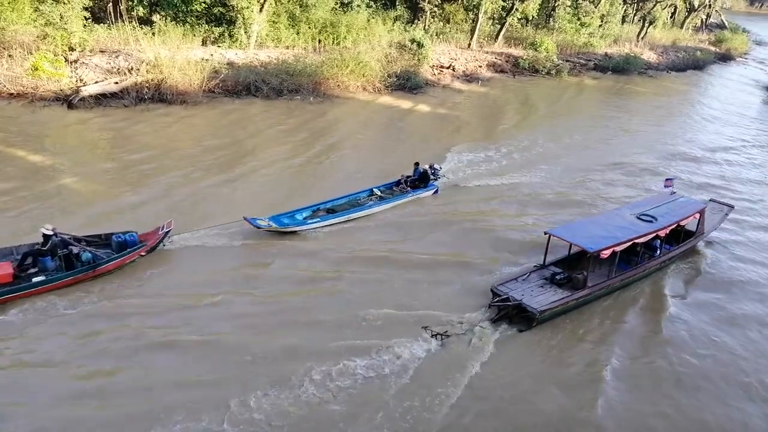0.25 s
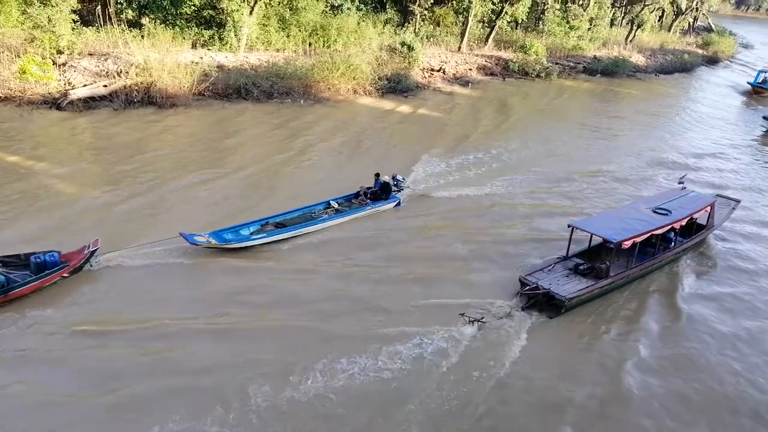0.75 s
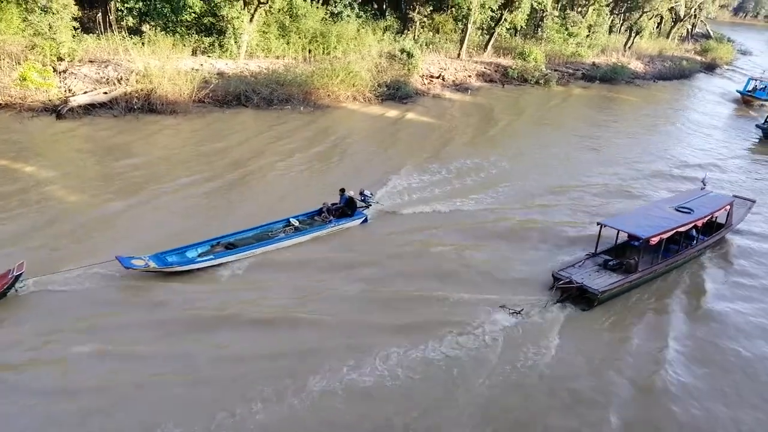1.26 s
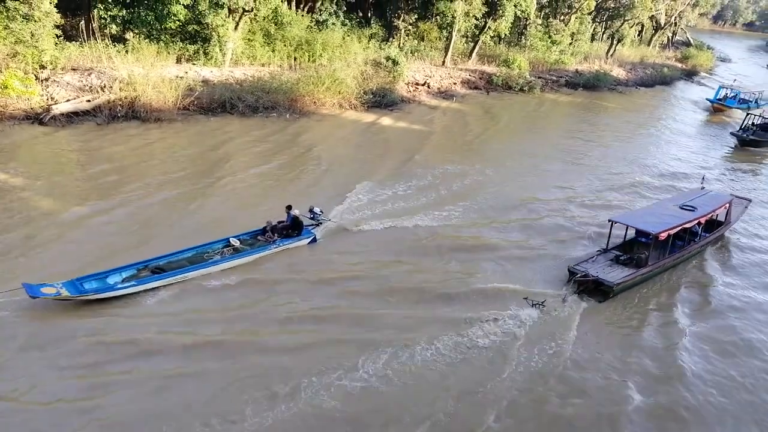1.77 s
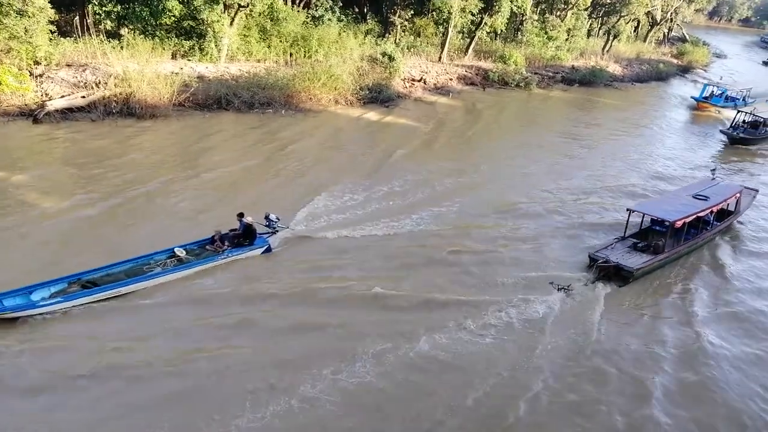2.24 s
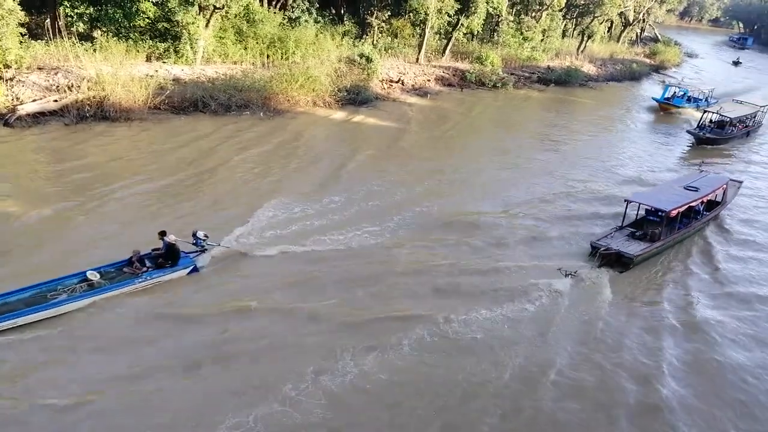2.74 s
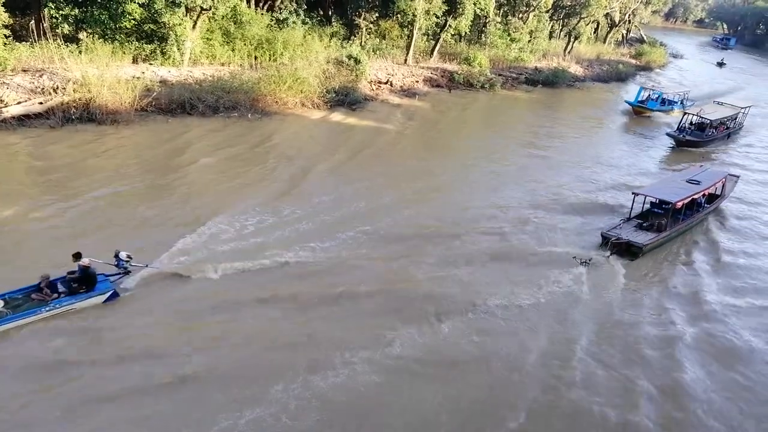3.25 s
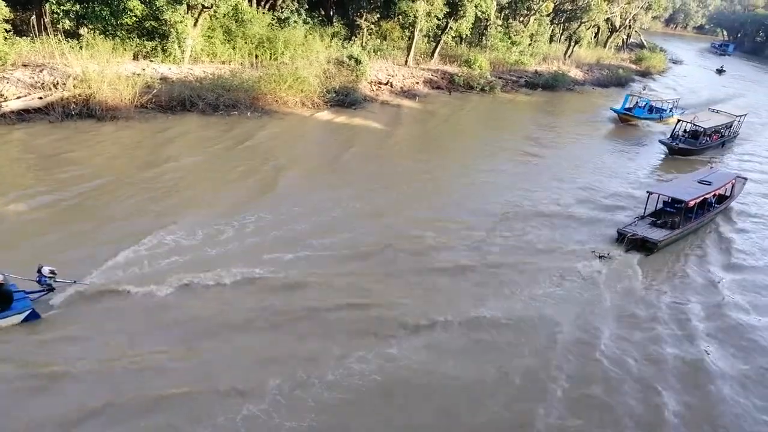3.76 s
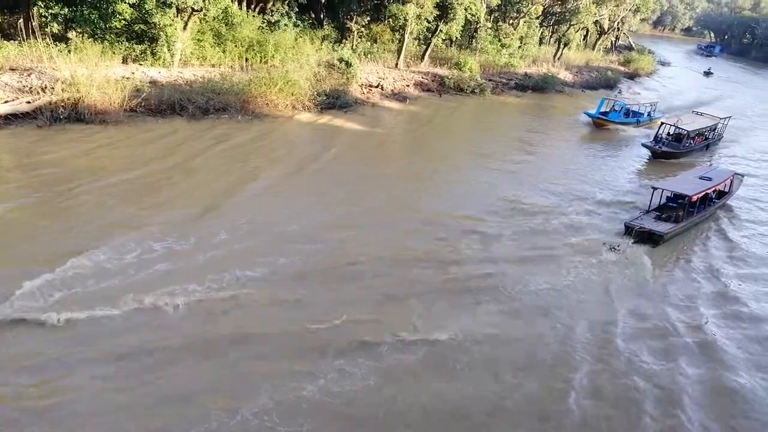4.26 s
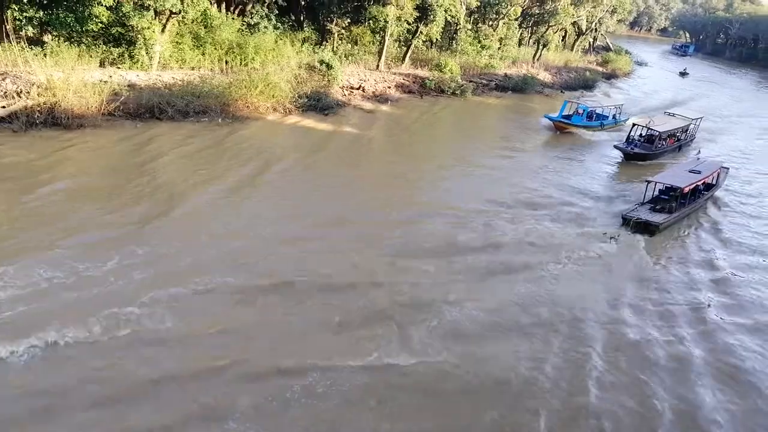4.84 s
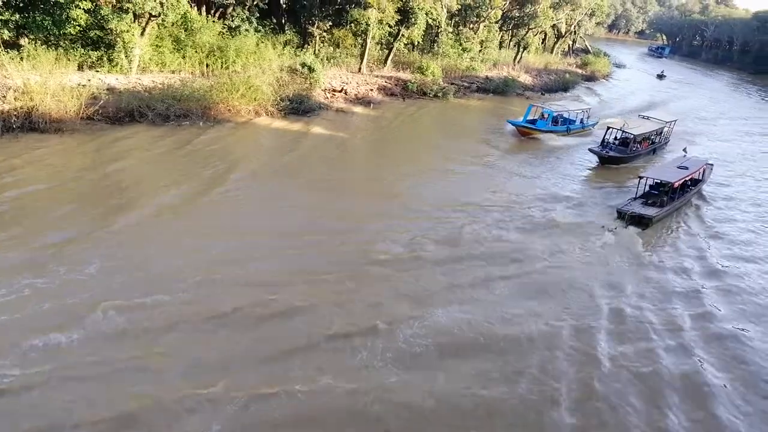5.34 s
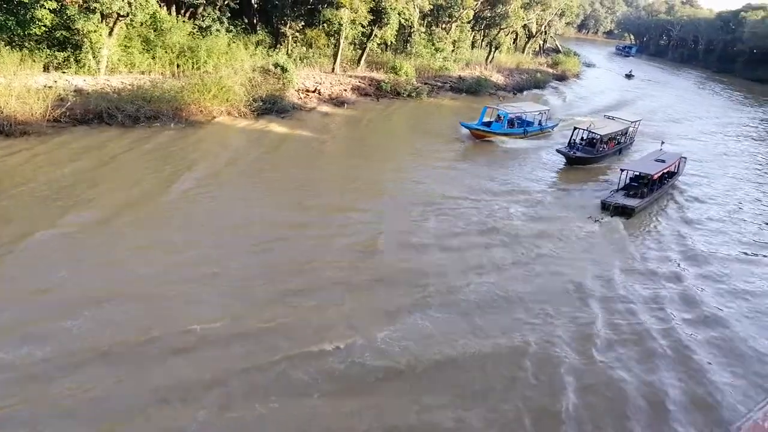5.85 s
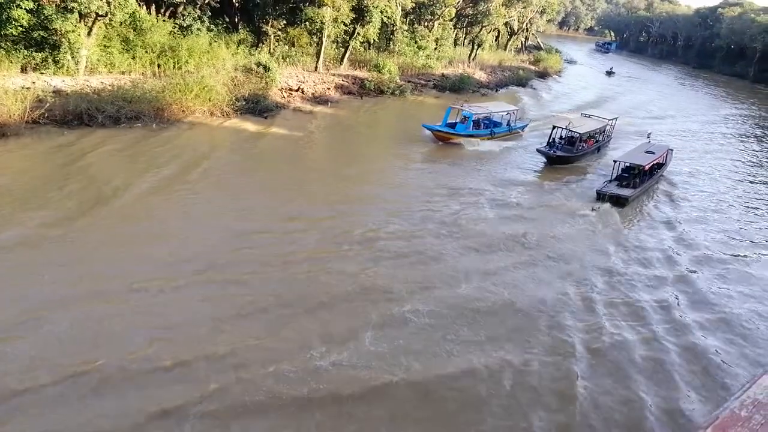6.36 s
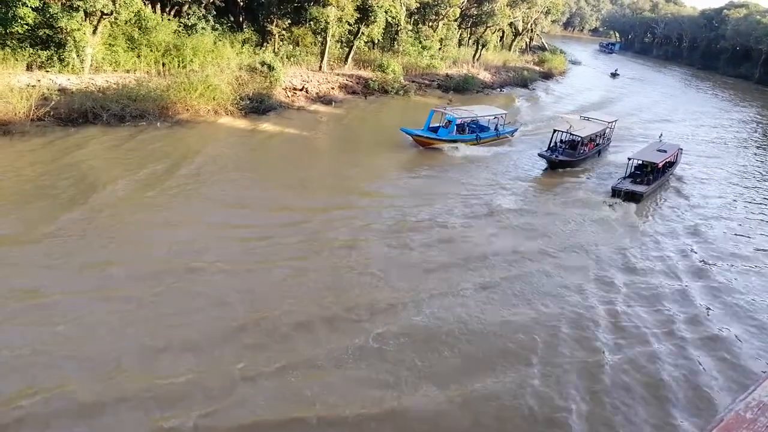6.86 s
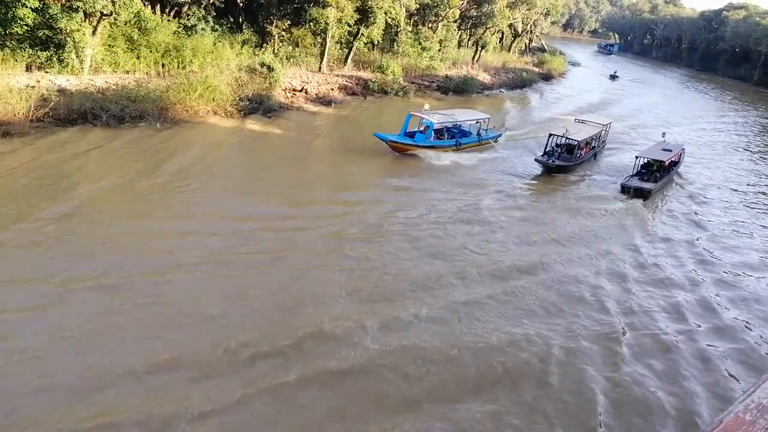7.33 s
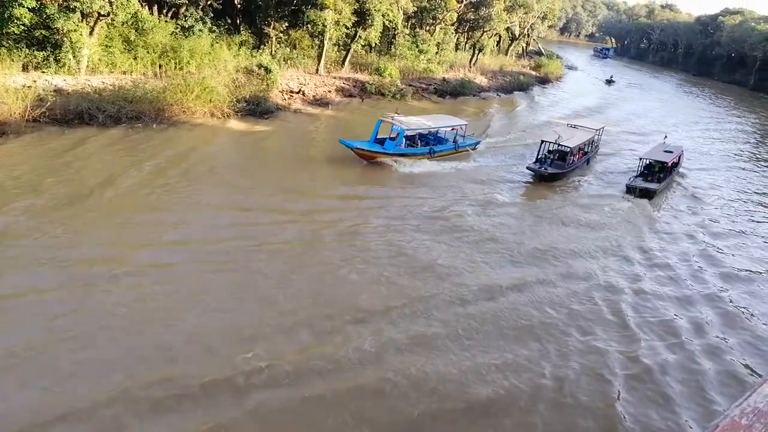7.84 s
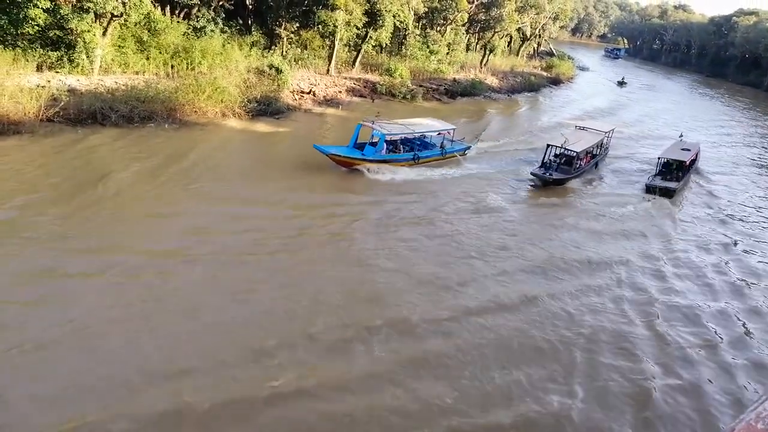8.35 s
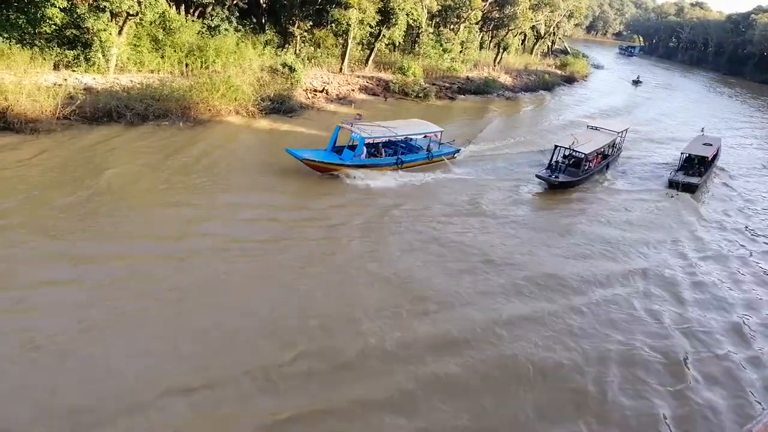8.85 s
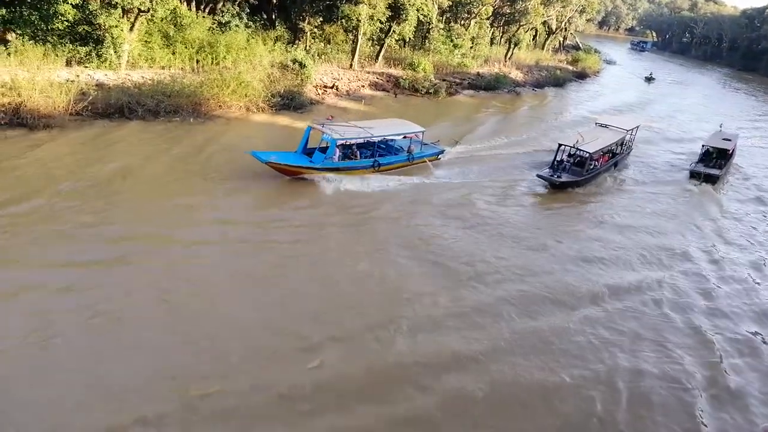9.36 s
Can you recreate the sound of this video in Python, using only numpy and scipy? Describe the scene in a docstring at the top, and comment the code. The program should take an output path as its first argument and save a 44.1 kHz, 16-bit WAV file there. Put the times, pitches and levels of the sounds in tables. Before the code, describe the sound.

Heard in stereo from close by on an open river, a small boat passes with a loud, rapid metallic clatter, while a slower engine knocks unevenly and a nasal outboard fades away. After about six seconds the rapid clatter is gone, leaving a motorboat's low drone, far engine rumble and steady water hiss. The slow engine gives a few isolated knocks, then throttles up again briefly.

```python
"""Two single-cylinder boat engines clatter close by on a wide river, one fast, one slow. Each firing is a hard
metallic knock over a low exhaust thump. The fast one passes and is gone by 6.4 s; the slow one coasts, then
picks up. A boat's ringing casing rasps at the start and fades. A launch's exhaust drones closer and sinks in
pitch as it passes, over the rumble of far boats and the hiss of wakes."""
import sys
import numpy as np
from scipy import signal
from scipy.fft import rfft, irfft
from scipy.io import wavfile
from scipy.ndimage import uniform_filter1d

SR = 44100
rng = np.random.default_rng(int(sys.argv[2]) if len(sys.argv) > 2 else 0)


def log_audio(samples):
    """Write samples as a 16-bit WAV file to the path given in sys.argv[1]."""
    # one column per channel
    frames = np.atleast_2d(samples).T
    # limit to full scale, then quantise
    limited = np.clip(frames, -1, 1)
    pcm = np.round(limited * 32767).astype(np.int16)
    wavfile.write(sys.argv[1], SR, pcm)


N = 423360  # 9.6 s
T = np.arange(N) / SR


def amp(db):
    """Decibels to gain."""
    return 10 ** (np.asarray(db) / 20)


def unit(x):
    """Scale to rms 1."""
    return x / np.sqrt(np.mean(x ** 2) + 1e-20)


def at(table, time_s):
    """Value columns of a time table, interpolated."""
    times, *columns = np.transpose(table)
    return [np.interp(time_s, times, column) for column in columns]


def spectrum_db(table, hz):
    """Spectrum table interpolated over log frequency."""
    table_hz, db = np.transpose(table)
    return np.interp(np.log(hz + 1), np.log(table_hz), db)


def bump(hz, centre_hz, width_oct):
    """Bell of height 1 over log frequency."""
    return np.exp(-(np.log2((hz + 1) / centre_hz) / width_oct) ** 2)


def colour(x, table):
    """Filter by a spectrum table."""
    return irfft(rfft(x) * amp(spectrum_db(table, np.fft.rfftfreq(N, 1 / SR))), N)


def resonate(x, hz, width_hz):
    """Steep resonance that follows the curve hz."""
    carrier = np.exp(2j * np.pi * np.cumsum(hz) / SR)
    pole = np.exp(-np.pi * width_hz / SR)
    return (carrier * signal.lfilter([(1 - pole) ** 2], [1, -2 * pole, pole * pole], x / carrier)).real


def drift(rate_hz):
    """Random wander below rate_hz, rms 1."""
    hz = np.fft.rfftfreq(N, 1 / SR)
    return unit(irfft(rfft(rng.standard_normal(N)) / (1 + (hz / rate_hz) ** 4), N))


def stereo_noise(correlation, size=N, repeated=0):
    """Partly correlated left and right noise, with an optional repeated part."""
    left, other = repeated + rng.standard_normal((2, size))
    return np.array([left, correlation * left + np.sqrt(1 - correlation ** 2) * other])


def delay_left(pair):
    """Sound reaches the left side 0.4 ms later."""
    return np.array([np.roll(pair[0], 17), pair[1]])


def add(mix, start_s, sound):
    """Mix a sound in at start_s."""
    part = mix[:, max(round(start_s * SR), 0):][:, :sound.shape[-1]]
    part += sound[..., :part.shape[1]]


def firing_cycles(rate_table, first_s):
    """Firing cycles since first_s, at every sample."""
    cycles = np.cumsum(at(rate_table, T)[0]) / SR
    return cycles - np.interp(first_s, T, cycles)


def firing_times(rate_table, first_s):
    """Time of each firing, in seconds."""
    cycles = firing_cycles(rate_table, first_s)
    return np.interp(np.arange(np.ceil(cycles[-1])), cycles, T)


# Far engines and hulls: (frequency [Hz], relative density [dB])
RUMBLE_SPECTRUM = [(15, -32), (28, -17), (45, -1), (70, 6.5), (110, 7), (170, 4), (240, -5), (330, -9.5),
                   (450, -20), (650, -45), (1200, -14), (3000, -74)]
# Rumble: (time [s], level [dB])
RUMBLE_LEVEL = [(0, -23), (.5, -24.5), (2, -27), (3.5, -26.5), (5.5, -26), (6.6, -26.5), (8, -26.5),
                (9.6, -27.5)]


def rumble():
    """Far engines blurred by the banks, nearly mono."""
    return amp(at(RUMBLE_LEVEL, T)[0]) * unit(colour(stereo_noise(0.99), RUMBLE_SPECTRUM))


# Wakes and far clatter: (frequency [Hz], relative density [dB])
WASH_SPECTRUM = [(100, -2.5), (400, -5), (680, -9.5), (900, -11), (1400, -4.5), (1950, -5), (2460, 2.5),
                 (3100, -4), (4000, -6.5), (5500, -7.5), (7800, -12), (9200, -18), (10500, -31.5),
                 (15000, -41.5)]
# Wash: (time [s], level [dB], left minus right [dB])
WASH_LEVEL = [(0, -29.5, -5), (1, -29, -1.5), (2, -29, -4), (3, -28.5, -5.5), (4, -29, -7.5),
              (5, -28, -2.5), (6, -27.5, 0), (7, -28, -3), (8, -28.5, -2), (9.6, -28, -2)]


def wash():
    """Fluttering hiss of wakes and far valve clatter; far engine casings ring in one narrow band."""
    level_db, side_db = at(WASH_LEVEL, T)
    flutter_db = 0.6 * drift(60) + 0.16 * drift(4.7) + 0.85 * np.array([drift(130), drift(120)])
    water = unit(colour(stereo_noise(0.059) * amp(flutter_db), WASH_SPECTRUM))
    casings = amp(-9) * unit(resonate(stereo_noise(0.99), np.full(N, 2480), width_hz=350))
    return delay_left(water + casings) * amp([level_db + side_db / 2, level_db - side_db / 2])


# Casing rasp: (time [s], level [dB], resonance shift [ratio])
CASING_RASP_PATH = [(0, -32, 0.94), (.4, -29.5, 0.98), (1, -36, 1.04), (1.5, -36, 1.33), (2.2, -41, 1.16),
                    (3, -58, 1.6)]
# Casing resonances: (unshifted frequency [Hz], width before broadening [Hz], relative gain [dB])
CASING_RASP_MODES = [(1103, 76, 7.5), (1326, 210, -0.5), (1750, 110, -2), (2660, 92, 0), (4200, 200, -4)]


def casing_rasp():
    """Nasal rasp of a ringing casing; its colour rises as it fades."""
    level_db, shift = at(CASING_RASP_PATH, T)
    drive = stereo_noise(0.28) * amp(2 * drift(60))
    casing = sum(amp(db) * resonate(drive, hz * shift, 1.7 * width) for hz, width, db in CASING_RASP_MODES)
    return delay_left(amp(level_db) * unit(casing))


# Launch firings, lowered by its passing: (time [s], rate [Hz])
LAUNCH_RATE = [(0, 74.35), (1.7, 74.9), (3.5, 75.2), (5.5, 75.27), (6.6, 75), (7.4, 74.4), (8.4, 73.5),
               (9, 72.4), (9.6, 71)]
# Firing tones: (time [s], fundamental [dB], 2nd harmonic [dB], 3rd harmonic [dB])
LAUNCH_TONES = [(0, -24.5, -27, -45.5), (1.2, -31, -35.5, -41.5), (2.2, -27.5, -35, -44),
                (3, -26.5, -44.5, -40), (4, -28.5, -37, -40.5), (5, -28.5, -28, -37),
                (5.9, -22.5, -32, -38), (6.35, -28, -38, -32.5), (6.75, -27, -25.5, -36.5),
                (7.5, -25.5, -28.5, -31.5), (8.6, -22.5, -23, -34), (9.1, -27.5, -24, -32),
                (9.6, -33, -23, -37)]
# Weak orders at peak rasp: (multiple of firing rate [ratio], rms level [dB])
LAUNCH_WEAK_ORDERS = [(.5, -42), (1.5, -37.5), (2.5, -44), (3.5, -49), (4, -44), (4.5, -52.5), (5, -53.5),
                      (6, -56), (12, -49.5), (13, -53.5), (14, -51.5), (15, -56.5), (16, -50)]
# Exhaust rasp: (frequency [Hz], relative density [dB])
RASP_SPECTRUM = [(300, -28), (700, -20), (800, -1), (880, 1.5), (1000, 0.5), (1120, -1), (1300, -8.5),
                 (2000, -15), (4000, -54)]
# Exhaust rasp: (time [s], level [dB])
RASP_LEVEL = [(0, -48), (4, -42.5), (5.5, -39.5), (6.5, -37.5), (7.7, -36), (8.6, -40), (9.6, -40.5)]


def launch():
    """Multi-cylinder exhaust: firing tones, weak orders from unequal cylinders, puffs of rasp."""
    cycles = firing_cycles(LAUNCH_RATE, first_s=0.01) + 0.016 * drift(3)
    rasp_db = at(RASP_LEVEL, T)[0]
    # harmonics line up into a sharp trough
    drone = -sum(amp(db + 1.27 * drift(6.6)) * np.cos(2 * np.pi * order * cycles)
                 for order, db in enumerate(at(LAUNCH_TONES, T), 1))
    weak_orders = sum(amp(db + 3.7 * drift(3)) * np.cos(2 * np.pi * (order * cycles + rng.random()))
                      for order, db in LAUNCH_WEAK_ORDERS)
    drone += amp(0.75 * (rasp_db - rasp_db.max())) * weak_orders
    puffs = stereo_noise(0.41) * (0.5 + np.exp(-(cycles % 1) / 0.41))
    return np.sqrt(2) * drone + amp(rasp_db) * unit(colour(puffs, RASP_SPECTRUM))


# Pipe and hull resonances: (frequency [Hz], relative level [dB], t60 [s])
EXHAUST_MODES = [(30.8, -7, 0.33), (92.2, 3, 0.21), (107, -11, 0.079), (124, -4, 0.099), (158, -9.5, 0.053),
                 (233, -17.5, 0.096), (310, -34, 0.014)]


def exhaust_thump(size=8192):
    """One puff rings pipe and hull, never quite alike; the deepest bass is cut away."""
    t = np.arange(size) / SR
    rings = np.zeros(size)
    for hz, db, t60_s in EXHAUST_MODES:
        envelope = amp(db + 0.66 * rng.normal() - 60 * t / t60_s)
        rings += envelope * np.sin(2 * np.pi * hz * (1 + 0.02 * rng.normal()) * t)
    return signal.sosfilt(signal.butter(2, 26, "high", fs=SR, output="sos"), rings)


KNOCK_SAMPLES = 4096
KNOCK_BINS_HZ = np.fft.rfftfreq(KNOCK_SAMPLES, 1 / SR)


def knock(ring_db, signature, decay_s, echo_db, rattle_db, correlation):
    """A blow, its hull echo and loose rattle ring the metal; the signature noise repeats each firing."""
    t = np.arange(KNOCK_SAMPLES) / SR
    bins = len(KNOCK_BINS_HZ)
    attack = 1 - np.exp(-t / 0.0013)
    blow = attack * (np.exp(-t / decay_s) + amp(echo_db) * np.exp(-t / 0.0084))
    rattle = amp(rattle_db) * signal.windows.tukey(KNOCK_SAMPLES, 0.5)
    burst = stereo_noise(correlation, KNOCK_SAMPLES, signature) * (blow + rattle)
    # no two blows excite the metal alike
    ripple_db = 2.8 * unit(uniform_filter1d(uniform_filter1d(rng.standard_normal(bins), 24), 24))
    log_gain = np.log(amp(ring_db + ripple_db))
    mirrored = np.concatenate([log_gain, log_gain[..., -2:0:-1]], -1)
    minimum_phase = np.exp(np.conj(signal.hilbert(mirrored)))[..., :bins]
    sound = irfft(rfft(burst) * minimum_phase)
    return delay_left(sound) / np.sqrt(np.sum(sound ** 2) / (2 * 0.012 * SR))  # energy of 12 ms at rms 1


# Slow engine firings: (time [s], rate [Hz])
SLOW_FIRING_RATE = [(0, 10.093), (5.7, 9.889), (6.4, 8.67), (8.35, 7.661), (8.8, 8.967), (9.3, 9.381)]
# Knock colour: (frequency [Hz], relative gain [dB])
SLOW_SPECTRUM = [(150, -62), (400, -12.5), (1000, -22), (1450, -4), (2000, -4), (2900, 6), (3800, -3),
                 (5300, -8.5), (7600, -10), (9000, -10), (10200, -20.5), (15000, -33)]
# Metal resonances: (frequency [Hz], width [oct], gain [dB])
SLOW_METAL_MODES = [(1752, 0.019, 8.5), (2176, 0.019, 10), (2397, 0.024, 7.5), (2880, 0.032, -15),
                    (3140, .05, -1.5), (4850, 0.1, 0), (5820, 0.026, 4.5), (7100, 0.071, 3)]
# Knock under throttle: (time [s], relative level [dB], treble gain [dB], ring centre [Hz])
SLOW_THROTTLE = [(0, -13, -4.5, 2300), (1.3, -10.5, -3.5, 2900), (2, -15, -5.5, 2350), (3.9, -15, -3, 2440),
                 (5.72, -14.5, 7.5, 2720), (5.76, -37.5, 6, 2650), (8.12, -30, 8.5, 2600),
                 (8.4, -15.5, -3.5, 2380), (8.65, -10, 9.5, 2290), (8.88, -13.5, 12, 3350),
                 (9.2, -17, 2.5, 2930), (9.6, -21.5, 6, 2500)]
# Misfires and hard firings: (time [s], level offset [dB])
SLOW_UNEVEN = [(.276, -3), (.87, 0.5), (.97, 1.5), (1.07, -25), (1.17, -3), (1.269, 1), (1.666, -8.5),
               (2.366, 3.5), (2.467, 5), (2.664, -6.5), (3.267, 6), (3.466, -5.5), (3.869, 2), (3.969, 1.5),
               (4.069, 0.5), (4.472, -6.5), (4.875, -14), (5.581, -2.5), (6.439, 9.5), (6.669, 16),
               (7.026, 14), (7.146, 6), (7.639, 8), (8.147, 9.5)]


def slow_engine():
    """Uneven knocks near 10 Hz; coasts quietly with stray hard firings, then the throttle reopens."""
    out, hz = np.zeros((2, N)), KNOCK_BINS_HZ
    signature = 0.55 * rng.standard_normal((2, KNOCK_SAMPLES))
    metal_db = spectrum_db(SLOW_SPECTRUM, hz)
    metal_db += sum(db * bump(hz, mode_hz, width_oct) for mode_hz, width_oct, db in SLOW_METAL_MODES)
    times = firing_times(SLOW_FIRING_RATE, first_s=0.0767)
    levels_db, trebles_db, rings_hz = at(SLOW_THROTTLE, times)
    for time_s, offset_db in SLOW_UNEVEN:
        levels_db[np.argmin(abs(times - time_s))] += offset_db
    for time_s, level_db, treble_db, ring_hz in zip(times, levels_db, trebles_db, rings_hz):
        force_db, edge_db, ring_oct, length_oct = rng.normal(scale=[0.86, 3, 0.22, 0.29])
        level_db += force_db
        shelf_db = (treble_db + edge_db) / (1 + (3900 / (hz + 1)) ** 6)
        lift_db = 5 * bump(hz, ring_hz * 2 ** ring_oct, width_oct=0.23)
        sound = knock(metal_db + shelf_db + lift_db, signature, decay_s=0.0057 * 2 ** length_oct,
                      echo_db=-3, rattle_db=-29.5, correlation=0.62)
        add(out, time_s - 0.0003, sound * amp([[level_db - 2], [level_db - 7]]))
        add(out, time_s - 0.0035, amp(level_db - 20) * exhaust_thump())
    return out


def hull_boom(time_s, hz=76.2, t60_s=0.65):
    """A puff rings the fast boat's hull, most when abreast; it throbs against the launch's tone."""
    t = np.arange(16384) / SR
    abreast = np.exp(-((time_s - 2.3) / 1.5) ** 2)
    return abreast * amp(-30 - 60 * t / t60_s) * np.sin(2 * np.pi * hz * t)


# Upper pipe resonances: (frequency [Hz], relative level [dB], t60 [s])
HOOT_MODES = [(715, -8, 0.18), (761, -4.5, 0.2)]
# Hoot, loudest with the pipe facing the listener: (time [s], gain [dB])
HOOT_GAIN = [(1.5, -46), (2.4, -31.5), (3.5, -34), (4.45, -21), (5.1, -34), (6, -32), (6.4, -42)]


def pipe_hoot(time_s):
    """A puff rings the fast engine's pipe, off to the right; it still sounds at the next puff."""
    t = np.arange(8192) / SR
    attack = 1 - np.exp(-t / 0.0037)
    rings = sum(amp(db - 60 * t / t60_s) * np.sin(2 * np.pi * hz * t + 0.31 * rng.normal())
                for hz, db, t60_s in HOOT_MODES)
    return amp(at(HOOT_GAIN, time_s)[0]) * amp([[-9], [0]]) * attack * rings


# Fast engine firings: (time [s], rate [Hz])
FAST_FIRING_RATE = [(0, 13.916), (1.7, 15.412), (2.5, 15.473), (6.4, 15.398)]
# Knock colour: (frequency [Hz], relative gain [dB])
FAST_SPECTRUM = [(150, -25), (350, -5.5), (560, -11), (770, -2.5), (1000, -2), (1700, 2), (2700, 6),
                 (3500, -0.5), (4400, 0), (5200, -10.5), (7500, -7.5), (9000, -18), (10200, -21.5),
                 (15000, -35.5)]
# Knock: (time [s], level [dB])
FAST_LEVEL = [(0, -22), (1.2, -14.5), (2.8, -16.5), (4.8, -14), (5.65, -16), (5.95, -17), (6.4, -28)]
# Pass-by: (time [s], reflection peak [Hz], reflection dip [Hz], left minus right [dB],
# relative thump level [dB])
FAST_PATH = [(0, 1250, 700, -1, 0), (.9, 1560, 915, -1.5, -8), (1.5, 1700, 970, 1, -2),
             (2, 2020, 1070, 2.5, -11), (2.6, 2220, 1250, 3.5, -11), (3.3, 2320, 1430, 3, -9.5),
             (4, 2440, 1500, 4, -1), (5, 2400, 1720, 3, -2), (5.9, 2200, 1940, 2.5, -2.5),
             (6.4, 2540, 1890, -1.5, -6)]
# Hull and cover resonances beaming at the listener in turn:
# (frequency [Hz], width [oct], peak time [s], 1/e half-span [s], left gain [dB], right gain [dB])
FAST_BEAMS = [(510, 0.36, 1.06, 1.1, 15, 14), (483, 0.27, 3.24, 0.92, 4, 11), (724, 0.14, 4.9, 4, 0, 12),
              (636, 0.16, 3.8, 1.7, 12, 7), (1282, 0.22, 0.63, 1.25, 16, 2.5),
              (2800, 0.18, 1.2, 0.73, -0.5, 7), (1560, 0.57, 8.55, 4.1, -3.5, 14.5),
              (4480, 0.063, 1.9, 1.4, 2.5, 10), (5570, 0.1, 3.1, 0.79, 4.5, 16),
              (4000, 0.044, 0.53, 0.4, 15.5, -6), (1146, 0.1, 4, 1.54, 10.5, -18)]


def fast_engine(gone_s=6.4):
    """Knocks near 15 Hz; the reflection off the water sweeps a peak and a dip through them."""
    out, hz = np.zeros((2, N)), KNOCK_BINS_HZ
    signature = 1.48 * rng.standard_normal((2, KNOCK_SAMPLES))
    metal_db = spectrum_db(FAST_SPECTRUM, hz)
    times = firing_times(FAST_FIRING_RATE, first_s=0.0347)
    for time_s in times[times < gone_s]:
        peak_hz, dip_hz, side_db, thump_db = at(FAST_PATH, time_s)
        water_db = np.outer([1, 0.15], 7 * bump(hz, peak_hz, 0.2) - 8 * bump(hz, dip_hz, 0.4))
        ring_db = metal_db + water_db
        for beam_hz, width_oct, peak_s, span_s, *gains_db in FAST_BEAMS:
            facing = np.exp(-((time_s - peak_s) / span_s) ** 2)
            ring_db += facing * np.outer(gains_db, bump(hz, beam_hz, width_oct))
        sound = knock(ring_db, signature, decay_s=0.0053, echo_db=-3.5, rattle_db=-18, correlation=0.66)
        level_db = at(FAST_LEVEL, time_s)[0] + 0.89 * rng.normal()
        add(out, time_s - 0.0005, sound * amp([[level_db], [level_db - side_db]]))
        add(out, time_s - 0.0045, amp(thump_db - 20) * exhaust_thump())
        add(out, time_s - 0.0075, hull_boom(time_s))
        add(out, time_s, pipe_hoot(time_s))
    return out


def scene():
    """All boats on the open river."""
    return fast_engine() + slow_engine() + casing_rasp() + launch() + rumble() + wash()


# Right microphone, shaded by its housing: (frequency [Hz], gain [dB])
RIGHT_SHADE = [(300, -0.65), (700, 0.5), (1000, 0), (1270, -3), (1700, 3), (2300, -2.5), (2750, 0.5),
               (3700, -9), (5600, -8), (6700, -15), (8200, -16.5), (9500, -21), (11000, 7), (15000, -5)]


def record(dry):
    """Right-side shading, 18 Hz low cut, 15.3 kHz band limit."""
    shaded = [dry[0], colour(dry[1], RIGHT_SHADE)]
    low_cut = signal.butter(2, 18, "high", fs=SR, output="sos")
    band_limit = signal.firwin(511, 15300, window=("kaiser", 9), fs=SR)
    return signal.oaconvolve(signal.sosfilt(low_cut, shaded), band_limit[None], "same")


dry = scene()
out = record(dry)
log_audio(out)
```